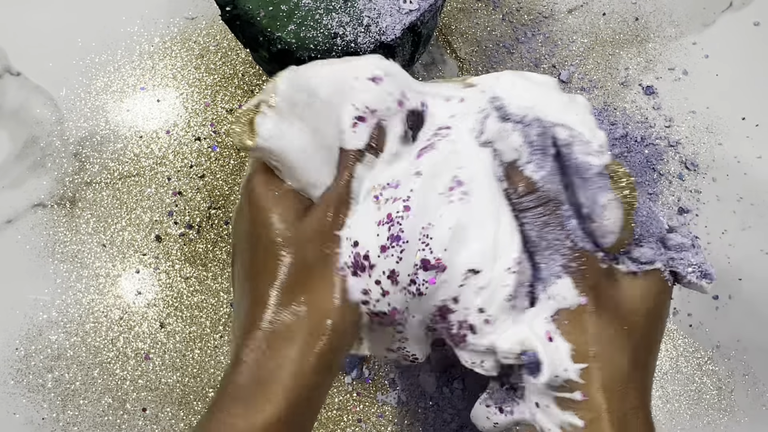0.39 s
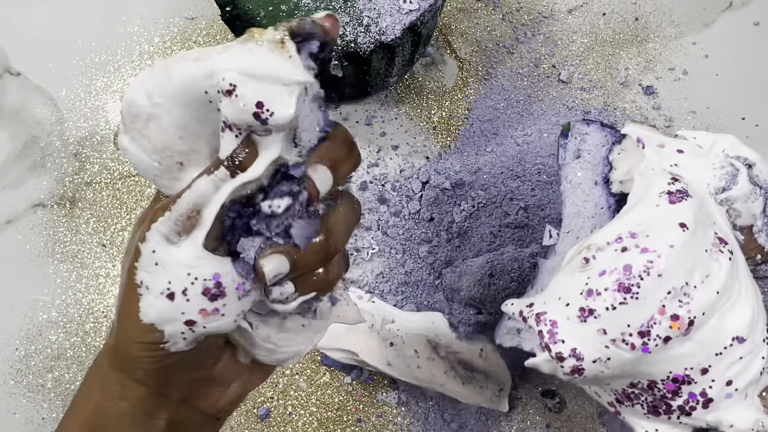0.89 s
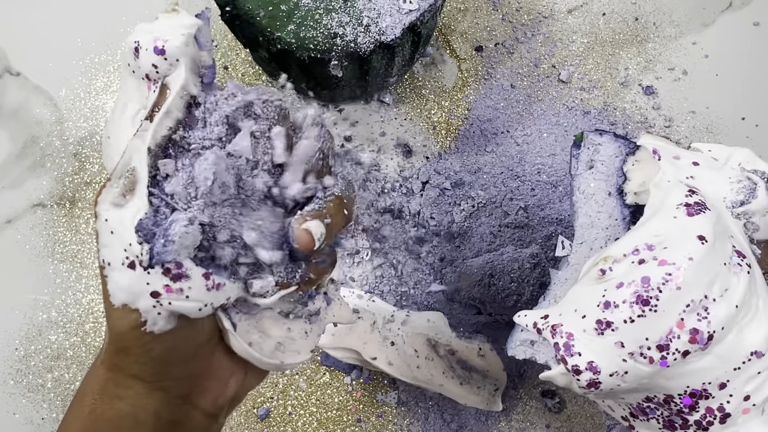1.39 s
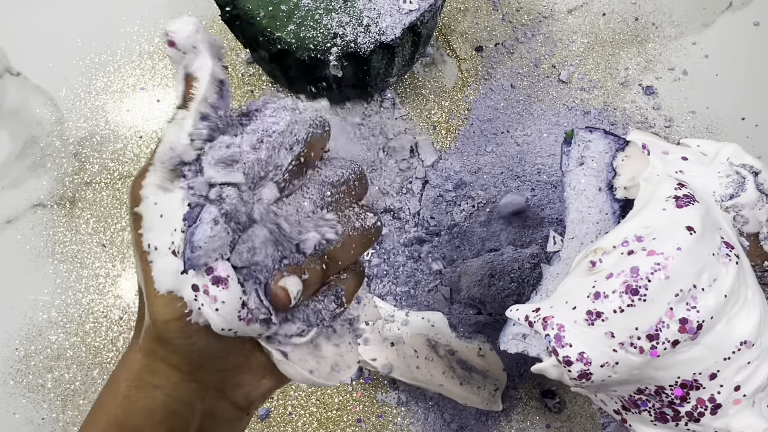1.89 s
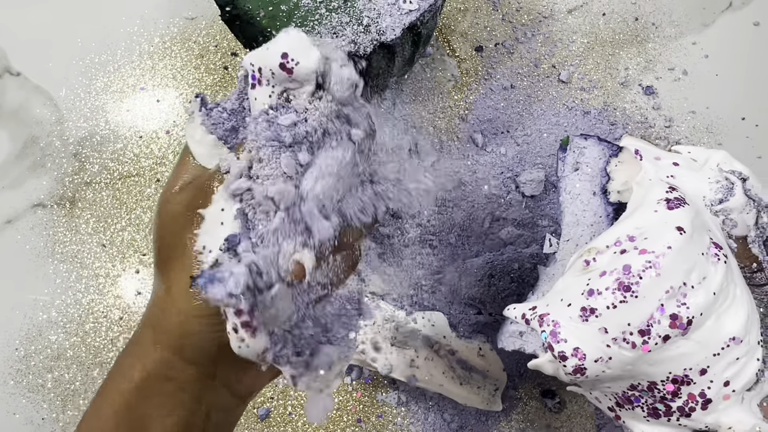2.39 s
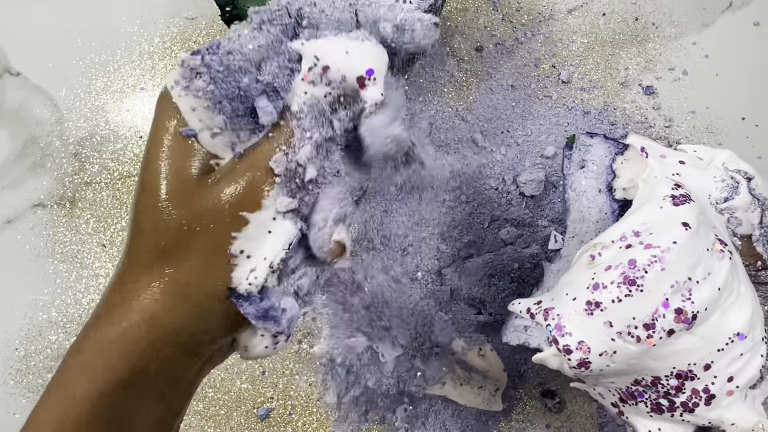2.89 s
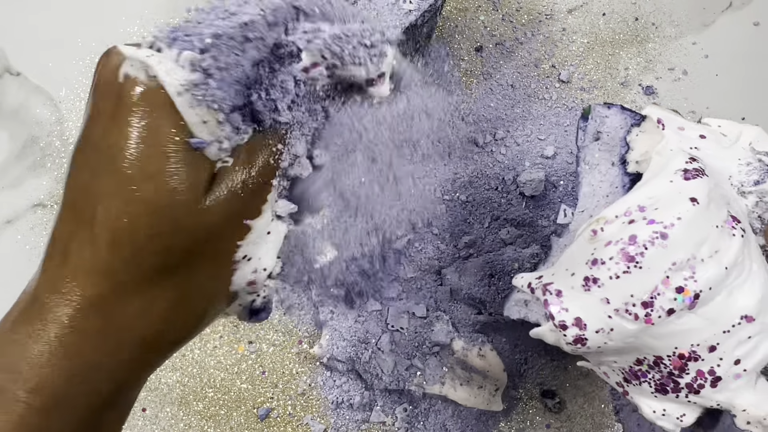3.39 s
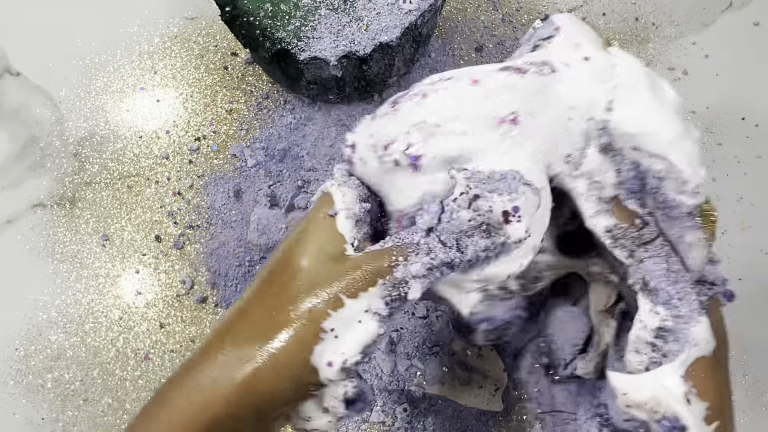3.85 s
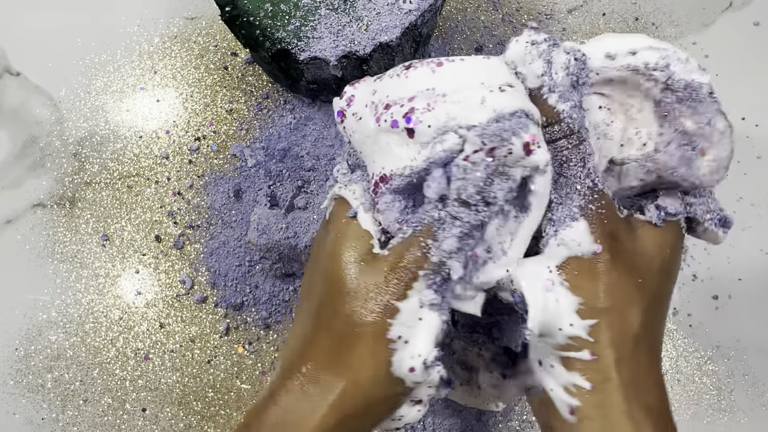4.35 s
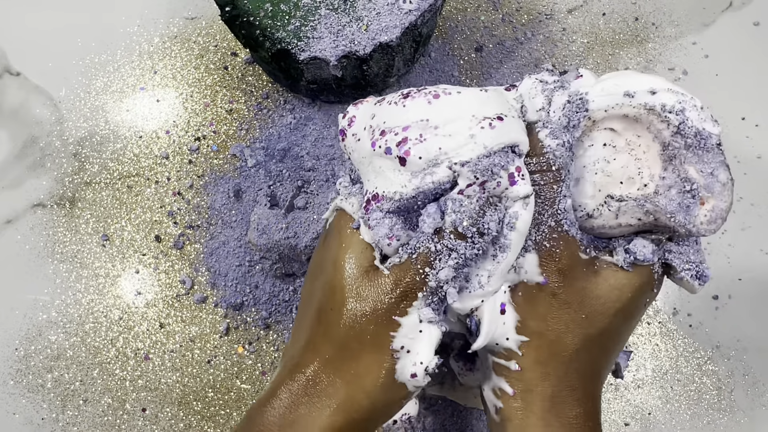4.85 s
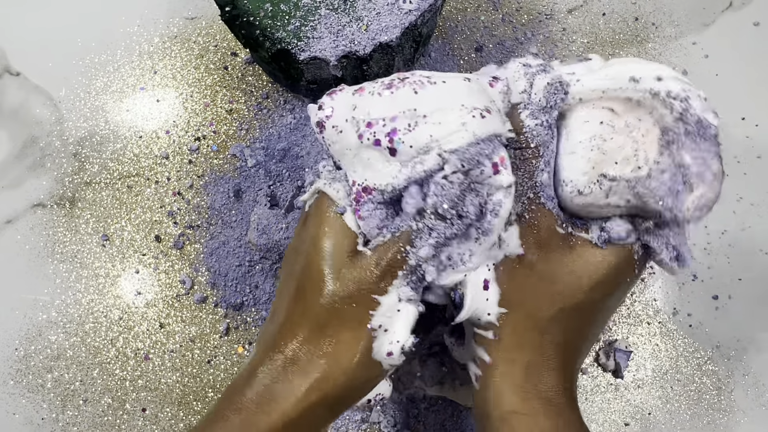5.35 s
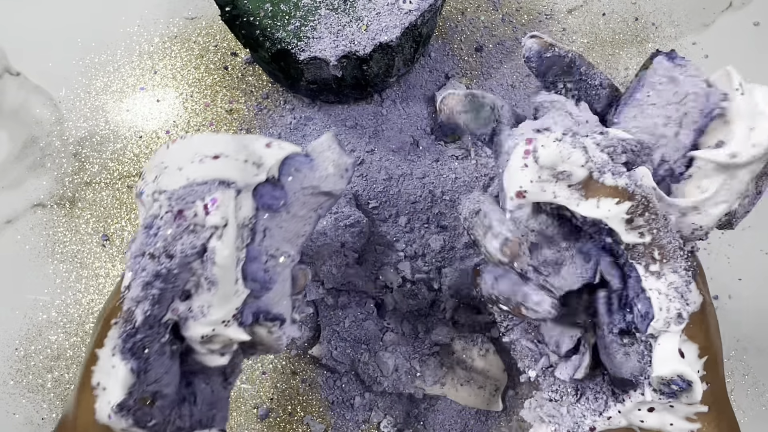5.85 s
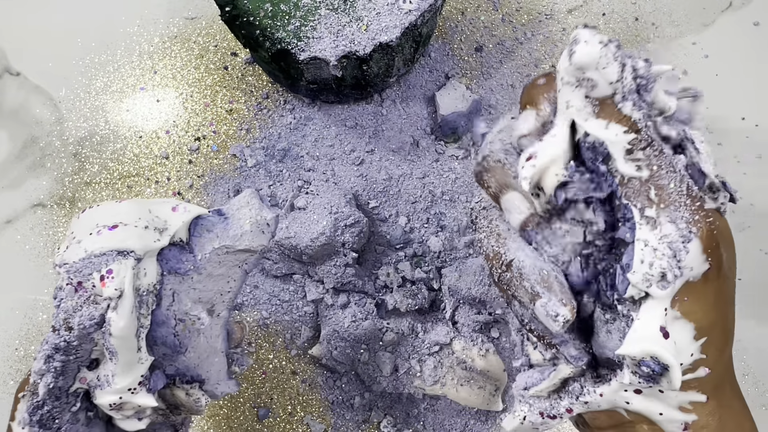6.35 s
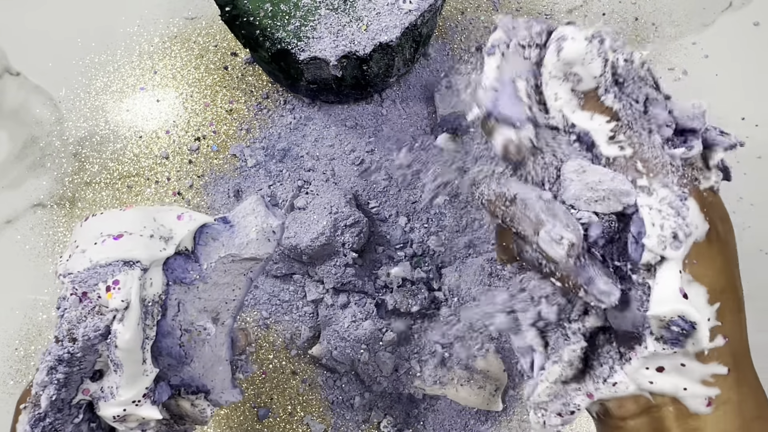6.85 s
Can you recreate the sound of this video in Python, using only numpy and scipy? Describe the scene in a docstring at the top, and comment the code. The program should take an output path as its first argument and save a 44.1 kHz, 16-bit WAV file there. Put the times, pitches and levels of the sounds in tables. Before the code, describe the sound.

Close stereo microphone above a stone table indoors. Hands break a dry chalk block: a few crunches, then a loud sharp crack at about one second and dense gritty crumbling. It thins to sparse crackles in the middle, then a heavy thud lands and crunching returns. A faint low rumble and hiss lie beneath.

```python
"""Crushing chalk over a stone table

Hands crush a dry chalk block close above a stone table top, under a two-port microphone.
Dust, grit and crumbs crackle: noise opened by random fractures, in an uneven trickle and crunches.
Bigger pieces snap and ring for a few cycles, chunks knock, and lumps thud on the modes of the table.
A low rumble of the house wavers underneath, with a faint hiss: both are filtered noise."""
import sys
import numpy as np
from scipy import signal
from scipy.fft import rfft, irfft, next_fast_len
from scipy.io import wavfile
from scipy.ndimage import uniform_filter1d

SR = 44100
rng = np.random.default_rng(int(sys.argv[2]) if len(sys.argv) > 2 else 0)


def gain_from_db(level_db):
    """Turn a decibel level (scalar or array-like) into a linear amplitude factor."""
    decades = np.asarray(level_db, float) / 20
    return 10 ** decades


def wav_out(sig):
    """Save sig, one row per channel (or a flat mono array), as 16-bit PCM at SR to the path in sys.argv[1]."""
    wavfile.write(sys.argv[1], SR, np.round(np.clip(np.atleast_2d(sig).T, -1, 1) * 32767).astype(np.int16))


N = 319284
T = np.arange(N) / SR
SIZE = next_fast_len(N + SR)
HZ = np.arange(SIZE // 2 + 1) * SR / SIZE + 1e-3  # just above zero, so that its logarithm exists


def shape(table, skirt_db=24):
    """Gain at each frequency from (Hz, dB) points, falling by skirt_db an octave outside them."""
    hz, db = np.transpose(table)
    octaves_below = np.maximum(np.log2(hz[0] / HZ), 0)
    octaves_above = np.maximum(np.log2(HZ / hz[-1]), 0)
    inside_db = np.interp(np.log(HZ), np.log(hz), db)
    return gain_from_db(inside_db - skirt_db * (octaves_below + octaves_above))


def colour(x, table):
    """Filter a sound to the tone colour in the table and set its rms to 1."""
    y = irfft(rfft(x, SIZE) * shape(table), SIZE)[..., :N]
    return y / np.std(y)


def ring(x, hz, t60):
    """One mode: struck by x, it swings at hz and dies away by 60 dB in t60 seconds."""
    pole = np.exp(2j * np.pi * hz / SR - np.log(1000) / (t60 * SR))
    return signal.lfilter([1], [1, -pole], x).imag


def walk(rate):
    """Random levels, each held for 1 / rate seconds with smoothed steps; spread 1."""
    hold = int(SR / rate)
    levels = np.repeat(rng.standard_normal(N // hold + 1), hold)
    y = uniform_filter1d(levels, hold)[:N]
    return y / np.std(y)


def house():
    """Low rumble that wavers in level, and the faint hiss of the room: two kinds of filtered noise."""
    # level of the rumble over time: (time [s], level [dB])
    rumble_level = [(0, -46), (1.4, -47.5), (2.4, -43.5), (3.3, -46.5), (3.9, -50.5), (5.2, -48),
                    (5.6, -48.5), (7.24, -44)]
    # tone colour of the rumble: (frequency [Hz], level per Hz [dB])
    rumble_colour = [(12, -79.5), (20, -37), (41, -12.5), (65, 0), (78, -4), (150, -16), (208, -35.5),
                     (264, -29), (400, -42), (580, -40.5), (760, -71)]
    # tone colour of the hiss: (frequency [Hz], level per Hz [dB])
    hiss_colour = [(200, 4.5), (900, -1), (5000, -3.5), (15500, -10.5)]
    level_db = np.interp(T, *np.transpose(rumble_level)) + 1.6 * walk(3.5)
    rumble = colour(rng.standard_normal((2, N)), rumble_colour) * gain_from_db(level_db)
    hiss = gain_from_db(-71) * colour(rng.standard_normal((2, N)), hiss_colour)
    return rumble + hiss


def crumbling():
    """Gains of grit, crumbs and dust: the trickle plus every crunch, quick to rise and slower to fade."""
    # uneven trickle that swells and thins: (time [s], fine grit [dB], coarse crumbs [dB], dust [dB])
    trickle = [(0, -66, -60.5, -72), (.2, -69, -78, -93), (.35, -55, -59.5, -61), (.6, -63.5, -59.5, -67.5),
               (.8, -71, -73, -67.5), (.92, -45, -56, -51), (1.2, -56, -67, -60.5), (1.75, -53, -56, -62),
               (2.03, -59, -59, -62.5), (2.2, -54, -84, -60), (2.35, -55, -54.5, -54.5),
               (2.65, -50.5, -50.5, -52.5), (2.87, -45, -48, -47), (3.08, -54.5, -53.5, -56.5),
               (3.22, -60, -72, -64.5), (3.38, -43.5, -48, -52.5), (3.5, -55, -63, -56),
               (3.76, -101, -65, -67), (4.0, -57, -63, -61.5), (4.21, -64.5, -70.5, -68),
               (4.28, -53.5, -68, -56.5), (4.41, -55.5, -62.5, -61.5), (4.48, -75, -70.5, -84),
               (5.3, -79, -79, -89), (5.45, -55.5, -61, -63.5), (5.7, -62.5, -78, -59),
               (5.9, -48.5, -64, -55), (6.17, -58.5, -81, -56), (6.35, -50.5, -61.5, -51),
               (6.55, -50.5, -51.5, -55), (6.62, -57.5, -81, -61.5), (6.76, -52.5, -61, -57.5),
               (6.95, -49.5, -46, -53.5), (7.24, -49, -52, -56)]
    # a piece gives way at once and its crumbs run out:
    # (time [s], grit [dB], crumbs [dB], dust [dB], time to fade by 60 dB [s])
    crunches = [(.075, -54, -47, -64, 0.36), (0.215, -39, -37.5, -49.5, 0.27),
                (0.367, -49, -42.5, -52.5, 0.28), (0.448, -47, -47, -56, .25), (0.529, -44, -59, -69, 0.14),
                (0.686, -56, -61, -53, 0.45), (0.926, -42.5, -37, -45.5, 0.35), (.96, -42, -43, -60, 0.42),
                (1.017, -32, -42, -36, 0.071), (1.117, -44, -44, -50, 1), (1.299, -44, -53, -49.5, 0.82),
                (1.398, -46, -42.5, -51, 0.17), (1.539, -52, -45.5, -49.5, 0.42),
                (1.634, -40.5, -56, -39, 0.17), (1.682, -42.5, -36.5, -71, 0.18),
                (1.827, -41.5, -41, -44, 0.32), (1.892, -33, -35, -46.5, 0.22),
                (2.054, -39.5, -48, -49, 0.24), (2.257, -46.5, -48, -49.5, 0.51),
                (2.445, -43, -41.5, -71, 0.27), (2.53, -31, -30.5, -57, 0.23), (3.523, -44.5, -52, -61, 1),
                (3.597, -39, -44, -48, 0.31), (3.8, -52, -80, -62.5, 1), (3.859, -48.5, -66, -57, 0.27),
                (3.903, -46.5, -46, -69, 0.11), (3.978, -48.5, -54, -51, 0.17),
                (4.049, -52, -64.5, -59, 0.69), (4.528, -44.5, -41, -55, 0.12),
                (4.578, -46, -56, -55, 0.16), (4.604, -43.5, -50, -69, 0.075),
                (5.008, -46.5, -42.5, -54, 0.17), (5.234, -47.5, -48.5, -55.5, 0.36),
                (5.378, -51, -73, -56, 0.13), (5.551, -48, -42, -58, 0.67), (5.758, -59, -76, -41.5, 0.075),
                (5.856, -39, -69, -41, 0.12), (6.052, -41, -47, -45.5, 0.2), (6.419, -35, -37, -44.5, 0.18),
                (6.815, -39.5, -37, -44, 0.45), (6.968, -40, -39, -42.5, 0.2),
                (7.006, -47.5, -48, -49, 0.77), (7.146, -68, -35, -81, 0.21)]
    rise_s = 0.0069
    times, *columns = np.transpose(trickle)
    power = np.array([gain_from_db(np.interp(T, times, column)) ** 2 for column in columns])
    for start, *dbs, t60 in crunches:
        i = int(start * SR)
        t = T[:min(SR, N - i)]
        burst = np.minimum(t / rise_s, 1) * np.exp(-np.log(1000) * t / t60)
        power[:, i:i + len(t)] += (gain_from_db(np.array(dbs))[:, None] * burst) ** 2
    return np.sqrt(power)


def breaks(rate, spread_db):
    """Fractures at random moments, rate of them a second; most are tiny, a few large."""
    size = gain_from_db(spread_db * np.minimum(rng.exponential(size=N), 3.6))
    return size * (rng.random(N) < rate / SR)


def crackle(hits, tail_ms, bed, patchy_db):
    """Each fracture opens a short burst of noise over sliding powder (bed)."""
    fall = np.exp(-1000 / (tail_ms * SR))
    gate = np.sqrt(signal.lfilter([1], [1, -fall], hits ** 2))
    gate = gate / np.sqrt(np.mean(gate ** 2))
    clumps = gain_from_db(patchy_db * walk(35.))
    # row two is the same burst heard from aside
    return (gate + bed) * clumps * rng.standard_normal((2, N))


def chips(rate, spread_db):
    """Lone chips let go at random and scrape briefly, each size ringing at its own pitch."""
    out = 0
    fall = np.exp(-1000 / (.7 * SR))  # a scrape dies away with a time constant of 0.7 ms
    for hz in 850 * 1.2 ** np.arange(12):
        scrape = signal.lfilter([1], [1, -fall], breaks(rate, spread_db)) * rng.standard_normal(N)
        loudness = np.sqrt(hz) / (1 + (hz / 6100.0) ** 2)  # the smallest are faint
        out = out + ring(scrape, hz, 22.0 / hz) * loudness
    return out / np.std(out)


def uneven(x, spread_db, rate):
    """Pieces of changing size: each half octave swells and fades on its own."""
    spectrum, out = rfft(x, SIZE), 0
    for hz in 700 * 2 ** np.arange(0, 3.1, .5):
        # the outermost bands also take all that lies beyond them
        octaves_away = np.abs(np.log2(np.clip(HZ, 700, 5600) / hz))
        band = np.maximum(1 - 2 * octaves_away, 0)
        out = out + gain_from_db(spread_db * walk(rate)) * irfft(spectrum * band, SIZE)[:, :N]
    return out / np.std(out)


def crumble():
    """Grit, dust and crumbs share the same fractures and add some of their own."""
    # tone colours, each: (frequency [Hz], level per Hz [dB])
    grit_colour = [(700, -22.5), (1100, -4.5), (1800, -1.5), (2900, -3), (4000, -5.5), (5000, -10.5)]
    dust_colour = [(4500, -6.5), (6800, -11), (8000, -10), (10000, -14), (12500, -13), (15500, -24.5)]
    crumb_colour = [(200, -3.5), (340, -5), (600, -3.5), (1000, -5), (1500, -10.5)]
    grit_gain, crumb_gain, dust_gain = crumbling()
    shared = gain_from_db(0.5) * breaks(280.0, 3.43)
    grit = colour(crackle(shared + breaks(270.0, 5.1), 4.6, 0.89, 0.89), grit_colour)
    grit = uneven(grit, spread_db=3.0, rate=22.) + gain_from_db(-3.0) * chips(35., 4.4)
    dust = colour(crackle(shared + breaks(610.0, 3.4), 0.94, 0.51, 1.8), dust_colour)
    crumbs = colour(crackle(shared + breaks(140., 4.2), 5.2, 0.25, 3.7), crumb_colour)
    return grit_gain * grit + dust_gain * dust + crumb_gain * crumbs


def thuds():
    """A lump lands and crumples; softer contact pushes longer and wakes only the low modes."""
    # lumps on the table: (time [s], peak level [dB], softness of contact [ms], rattle length [ms],
    # freedom to ring [0-1])
    lumps = [(0.08, -43.5, 0.43, 71, 1), (.221, -26.5, 2.5, 25, 0.28), (1.683, -29.5, 0.039, 31, 0.53),
             (1.865, -34.5, 0.27, 16, 0.6), (1.899, -27.5, 0.74, 42, 0.8), (2.262, -37.5, 0.59, 16, 1),
             (2.445, -30.5, 0.062, 19, 1), (2.533, -21, 0.033, 40, 0.4), (3.62, -35, 0.21, 27, 0.36),
             (4.536, -58, 0.14, 8.1, 0.24), (5.011, -36.5, 0.43, 11, 0.16), (5.237, -28, 2.0, 15, 0.14),
             (5.55, -11, 0.37, 19, 0.45), (5.558, -15.5, 0.7, 36, 0.66), (5.617, -28, 1.6, 14, 0.3),
             (6.056, -38.5, 0.55, 32, 0.9), (6.069, -28.5, 1.3, 17, 0.9), (6.098, -29.5, 1.5, 26, 0.6),
             (6.421, -26.5, 1.6, 27, 1), (6.496, -27, 0.57, 38, 0.63), (6.815, -20.5, 0.29, 4.2, 1),
             (7.008, -30.5, 0.59, 8.7, 0), (7.144, -25, 0.24, 11, 0.8)]
    # modes of the table top: (frequency [Hz], level [dB], time to fade by 60 dB [s])
    table_modes = [(138.5, 2.5, 0.14), (229, -3, 0.067), (335, 2, 0.19), (433, -1.7, 0.11),
                   (570, 0.5, 0.035), (653.7, 0.5, 0.19), (722, -5, 0.092), (800, -13, 0.097),
                   (962, -4, 0.057), (1267, -14.5, 0.093), (1540, -8.5, 0.12), (1690, -9.5, 0.089),
                   (2630, -8, 0.05)]
    bending_lag_s = 0.00196  # sets how far the bending waves of the lower modes come later
    out, t = np.zeros(N + SR), np.arange(SR // 4) / SR
    chance = rng.standard_normal((len(lumps), len(t) + len(table_modes)))
    for (s, db, soft_ms, rattle_ms, free), noise in zip(lumps, chance):
        push = np.exp(-t * 1000 / max(soft_ms, .03)) * t
        rattle = noise[:len(t)] * np.exp(-t * 1000 / max(rattle_ms, .5))
        rattle[0] = 33.0  # the first contact
        # the air hears the change of the force, not the steady load
        crunch = np.diff(signal.fftconvolve(rattle, push)[:len(t)], prepend=0)
        # each landing spot favours other modes; neighbours swing in opposite directions
        spots = gain_from_db(1.53 * noise[len(t):]) * (-1) ** np.arange(len(table_modes))
        modes = 0
        for (hz, mode_db, t60), spot in zip(table_modes, spots):
            lag = bending_lag_s * (np.sqrt(1000 / hz) - .5)
            late = np.interp(t - lag, t, crunch, left=0)
            # powder and hands resting on the top shorten its ring
            modes = modes + spot * gain_from_db(mode_db) * ring(late, hz, t60 * max(free, .1))
        body = modes / np.std(modes) + 0.033 * crunch / np.std(crunch)
        i = int(s * SR)
        out[i:i + len(t)] += gain_from_db(db) * body / np.abs(body).max()
    return out[:N]


def snaps():
    """A click that rings a few cycles at the size of the piece, then a fading spray of chips."""
    # breaking pieces: (time [s], level of the click [dB], centre frequency [Hz])
    pieces = [(0.8524, -30.5, 7300), (0.908, -36, 1200), (0.9672, -14.5, 6340), (0.9682, -24.5, 1110),
              (1.0169, -25.5, 850), (1.023, -23, 8450), (1.109, -18, 2900), (1.1164, -3.5, 8450),
              (1.1172, -2.5, 2760), (1.12, -6, 3800), (1.301, -26, 2630), (1.4327, -19, 4430),
              (1.516, -40.5, 1730), (1.599, -28, 2060), (1.632, -28, 2000), (1.6417, -25, 5900),
              (1.684, -22, 1780), (1.831, -26, 2440), (1.867, -27, 800), (1.882, -28, 4060),
              (1.901, -27, 1690), (2.2652, -27, 3460), (2.4023, -33, 4600), (2.445, -20.5, 1800),
              (2.489, -52, 3800), (2.533, -16, 1460), (2.743, -27.5, 2340), (2.891, -31.5, 3350),
              (2.9457, -27, 4080), (3.254, -34, 1030), (3.3718, -27.5, 1150), (3.3892, -24.5, 1390),
              (3.42, -19, 2580), (3.4231, -19, 4100), (3.5167, -24.5, 4200), (3.624, -24.5, 2600),
              (3.909, -44.5, 755), (3.982, -34.5, 1290), (4.38, -34, 1100), (4.58, -27.5, 2180),
              (4.581, -31, 8450), (4.606, -29.5, 1630), (4.876, -40.5, 8240), (4.9774, -34.5, 6400),
              (5.449, -32, 3830), (5.484, -25.5, 2670), (5.868, -33, 1700), (5.883, -32, 1500),
              (5.897, -25.5, 1800), (6.372, -24.5, 3200), (6.4236, -26, 1640), (6.466, -22, 2450),
              (6.849, -31, 1500), (6.965, -28, 2600), (7.008, -21.5, 900), (7.057, -28, 2300)]
    spray_db, spray_per_db = -21.5, 1.1  # spray after a 0 dB snap [dB]; its growth per dB of snap
    out, t = np.zeros(N + SR), np.arange(SR // 8) / SR
    for (s, db, hz), noise in zip(pieces, rng.standard_normal((len(pieces), 2, len(t)))):
        tick = (1 + 0.34 * noise[0]) * np.exp(-t / .00008)
        click = np.diff(tick, prepend=0)
        rung = ring(ring(click, hz, 4.5 / hz), hz, 2.4 / hz)
        head = rung / np.abs(rung).max() + 0.086 * click
        spray = ring(np.diff(noise[1], prepend=0), hz, 1.9 / hz)
        # the spray of high-pitched pieces fades sooner
        fade = np.exp(-t * np.sqrt(hz) / 0.26) * np.minimum(t / 0.0017, 1)
        tail = spray / np.std(spray) * fade
        i = int(s * SR)
        out[i:i + len(t)] += gain_from_db(db) * head + gain_from_db(spray_db + spray_per_db * db) * tail
    return out[:N]


def knocks():
    """A chunk rubs briefly against another and rings at its own pitch, which sags as the grip closes."""
    # loose chunks knock together: (time [s], peak level [dB], starting pitch [Hz])
    chunks = [(2.791, -35, 1650), (4.057, -41, 1420), (5.012, -31, 1080), (5.568, -38, 1560),
              (5.759, -34.5, 2070), (5.806, -38, 2030), (6.932, -34, 1900), (6.978, -34, 840),
              (7.036, -34.5, 1690)]
    cycles = 15.  # swings until the ring has faded by 60 dB
    rub_peak_s, sag_per_s = 0.003, 7.  # the rub is strongest here; share of pitch lost per second
    out, t = np.zeros(N + SR), np.arange(SR // 16) / SR
    for (s, db, hz), noise in zip(chunks, rng.standard_normal((len(chunks), len(t)))):
        rub = noise * t * np.exp(-t / rub_peak_s)
        faint_lower = gain_from_db(-29) * ring(rub, 0.72 * hz, cycles / hz)
        body = ring(rub, hz, cycles / hz) + faint_lower
        # reading the sound ever more slowly lowers its pitch
        body = np.interp(t - sag_per_s * t ** 2 / 2, t, body)
        i = int(s * SR)
        out[i:i + len(t)] += gain_from_db(db) * body / np.abs(body).max()
    return out[:N]


def room(x, t60=0.34, wet_db=-14):
    """A short tail from the near walls: fading noise that starts after 3 ms."""
    t = np.arange(SR // 2) / SR
    tail = rng.standard_normal(len(t)) * np.exp(-np.log(1000) * t / t60) * (t > .003)
    tail = tail / np.sqrt(np.sum(tail ** 2))
    return gain_from_db(wet_db) * signal.fftconvolve(x, tail)[:N]


def scene():
    """The ports hear one sound with a lag: their difference is a quarter cycle off, plus sound from aside."""
    # difference of the two ports: (frequency [Hz], level [dB])
    port_difference = [(60, -32), (130, -10.5), (300, -3.5), (650, 1.5), (1100, -5), (1800, -16),
                       (2800, -6.5), (5000, -5.5), (6500, -16), (8000, -6.5), (10500, 2.5), (13000, 6.5),
                       (15800, 13.5)]
    # unrelated share of that difference: (frequency [Hz], share [0-1])
    unrelated = [(100, .6), (640, 0.93), (1500, 0.6), (5000, .6), (9000, 0.06), (13000, 0)]
    # left over right: (frequency [Hz], level [dB])
    balance = [(380, -.5), (700, -4.5), (1290, -2), (2380, 0)]
    # sum of the two ports: (frequency [Hz], level [dB]); the housing dips near 5 kHz,
    # and above 12.3 kHz most of the sum is missing
    port_sum = [(20, -0.5), (4300, -1.76), (5100, -4.5), (6000, 1.5), (12300, 0.0),
                (12900, -29.0), (16000, -8.5)]
    thud_side = gain_from_db(-9)  # the table top faces both ports alike
    sharp, table = snaps() + knocks(), thuds()
    hits = sharp + table
    crackling, aside = crumble() + house()
    front = rfft(crackling + hits + room(hits), SIZE)
    lagged = front - (1 - thud_side) * rfft(table, SIZE)
    aside = rfft(aside + room(sharp + thud_side * table, t60=0.089, wet_db=-7.5), SIZE)
    share = np.clip(np.interp(HZ, *np.transpose(unrelated)), 0, 1)
    # -1j turns every frequency by a quarter cycle
    difference = np.sqrt(1 - share) * -1j * lagged + np.sqrt(share) * aside
    side = shape(port_difference, 0) * difference
    mid = front * shape(port_sum, 0)
    lean = np.sqrt(shape(balance, 0))  # half of the balance goes to each port
    return irfft(np.array([(mid + side) * lean, (mid - side) / lean]), SIZE)[:, :N]


def low_pass(x):
    """Removes everything above the highest recorded frequency."""
    return signal.sosfilt(signal.butter(12, 17340, fs=SR, output="sos"), x)


def record(dry):
    """The recorder cuts the top steeply above 16 kHz."""
    top = signal.ellip(8, .2, 70, 16000, fs=SR, output="sos")
    mix = signal.sosfilt(top, dry)
    return low_pass(mix)


dry = scene()
out = record(dry)
wav_out(out)
```